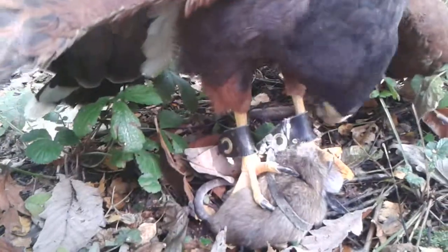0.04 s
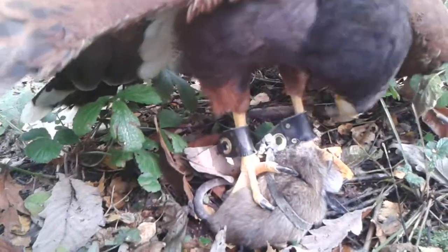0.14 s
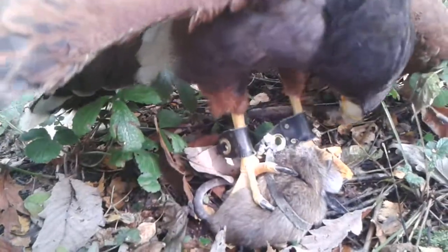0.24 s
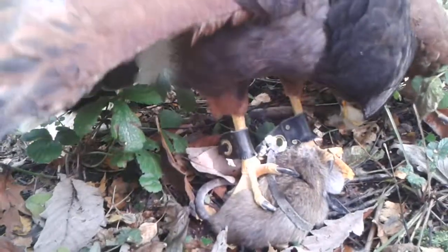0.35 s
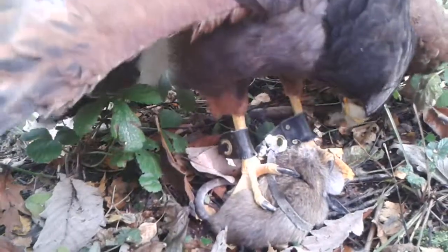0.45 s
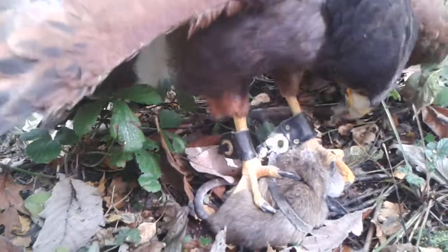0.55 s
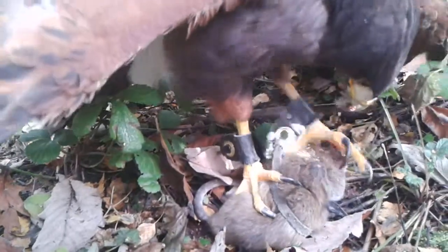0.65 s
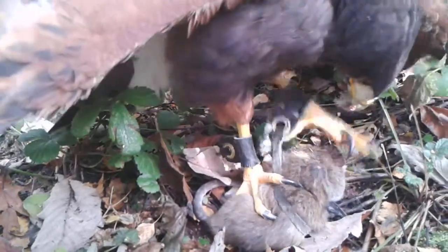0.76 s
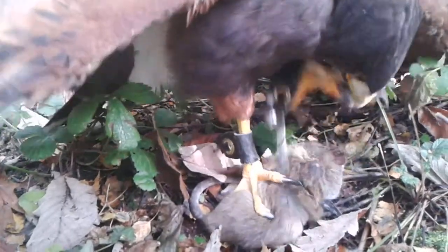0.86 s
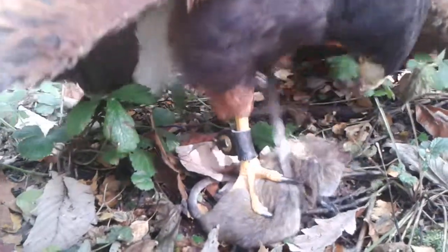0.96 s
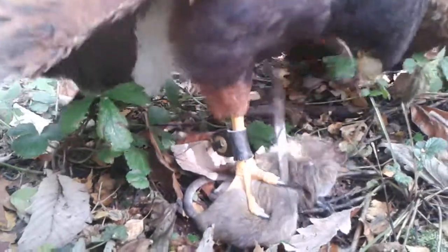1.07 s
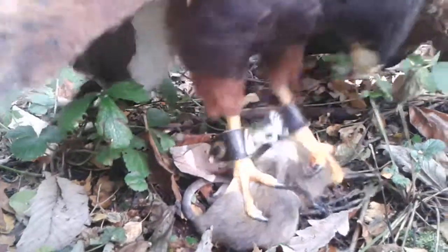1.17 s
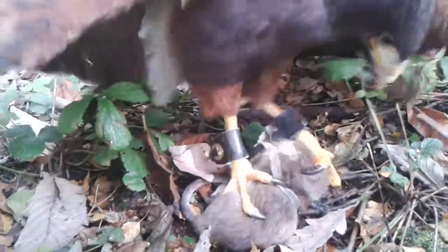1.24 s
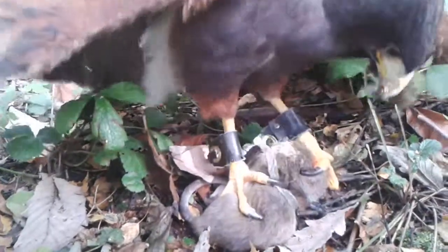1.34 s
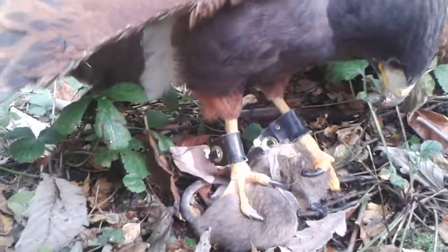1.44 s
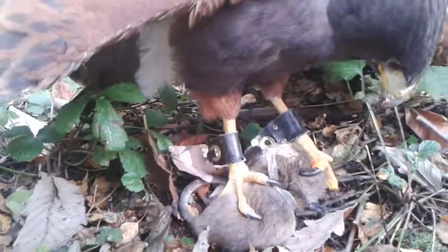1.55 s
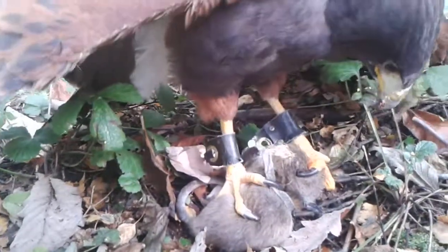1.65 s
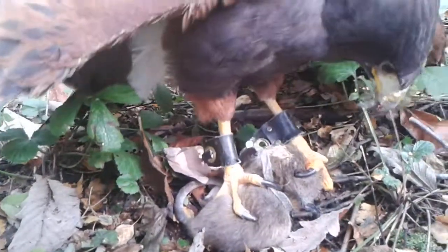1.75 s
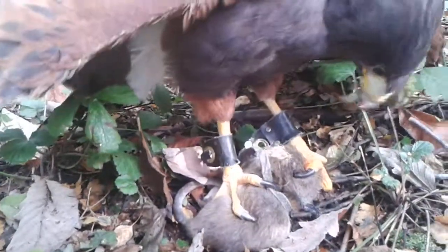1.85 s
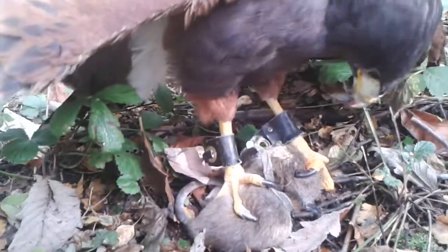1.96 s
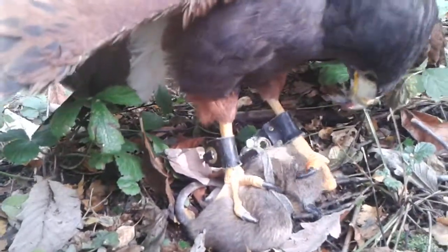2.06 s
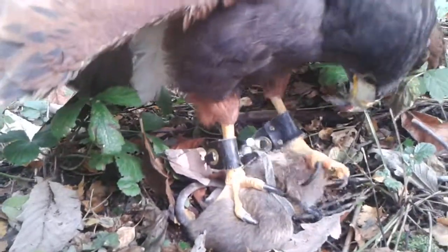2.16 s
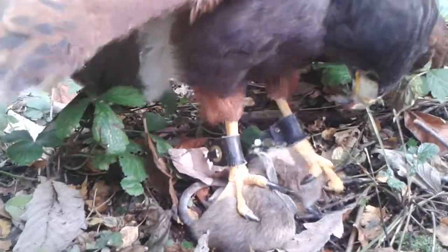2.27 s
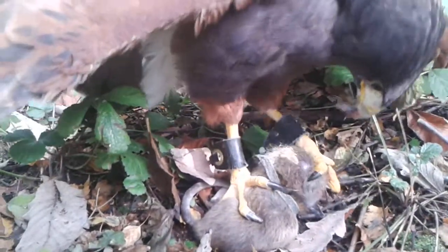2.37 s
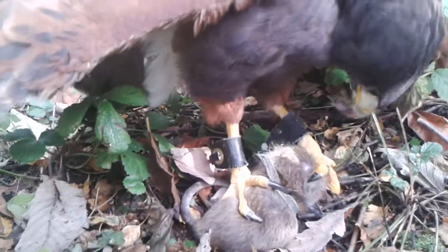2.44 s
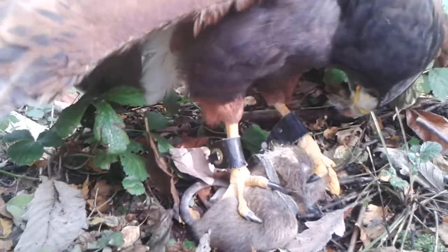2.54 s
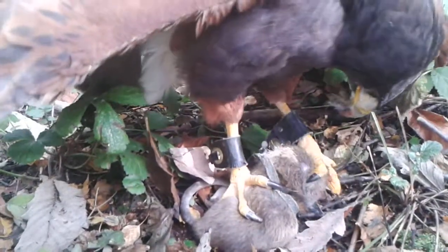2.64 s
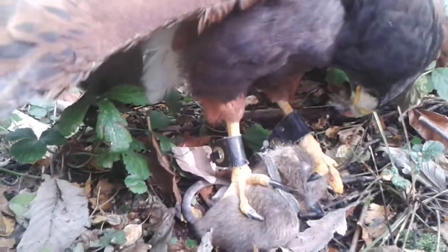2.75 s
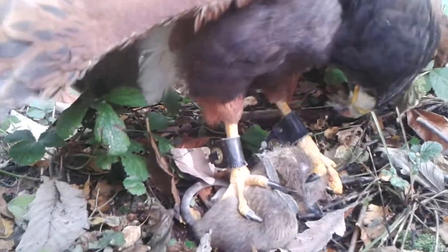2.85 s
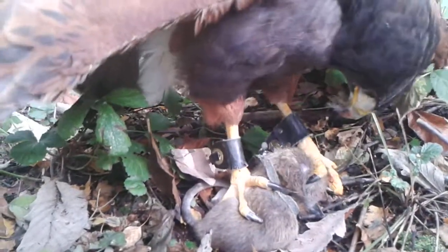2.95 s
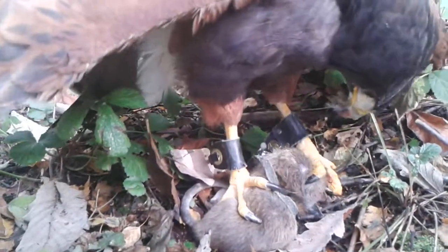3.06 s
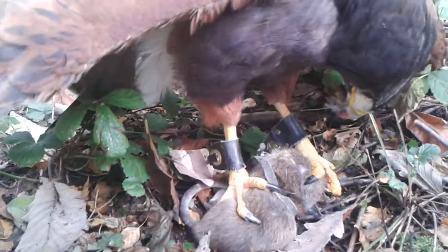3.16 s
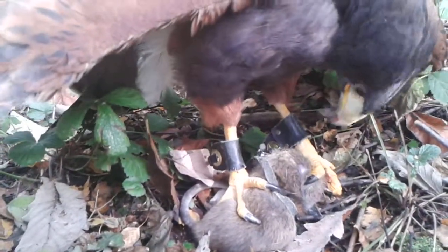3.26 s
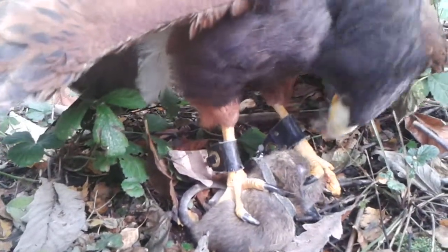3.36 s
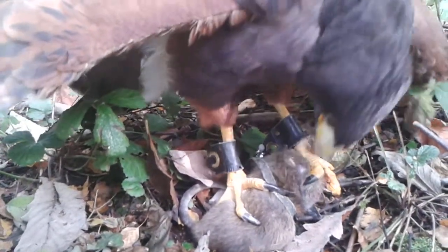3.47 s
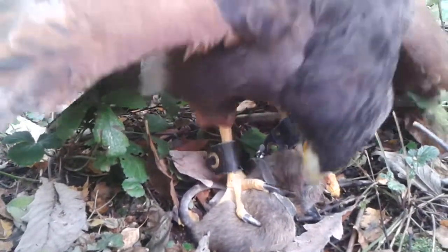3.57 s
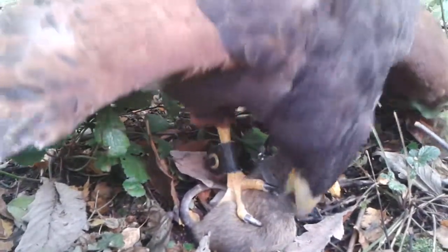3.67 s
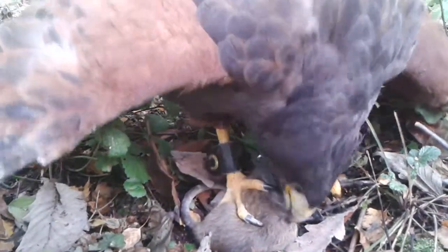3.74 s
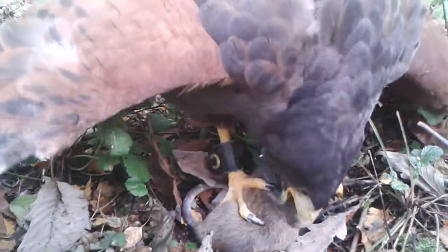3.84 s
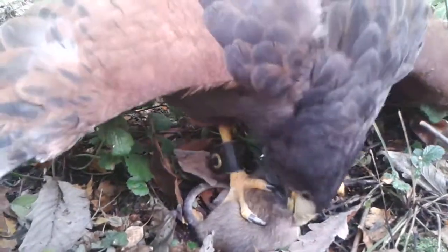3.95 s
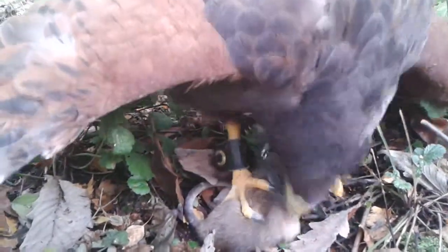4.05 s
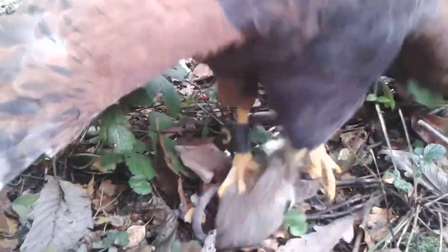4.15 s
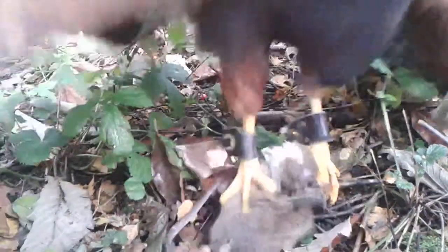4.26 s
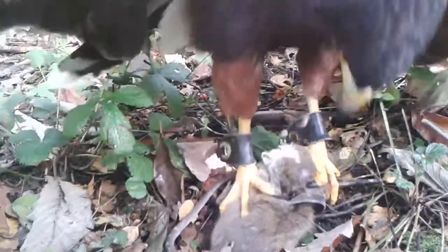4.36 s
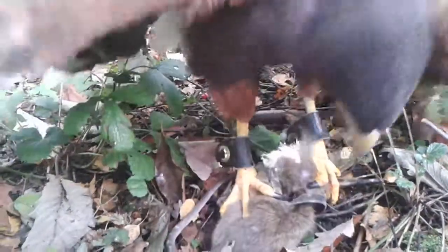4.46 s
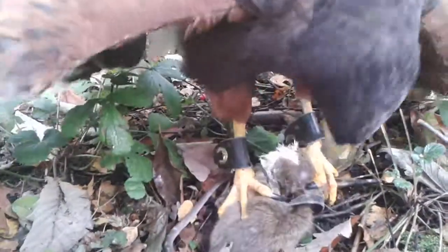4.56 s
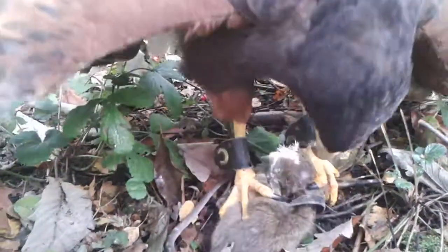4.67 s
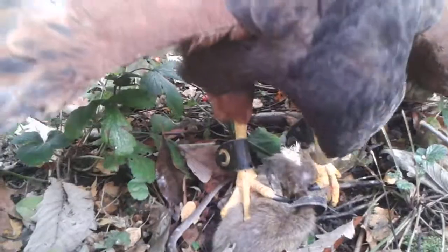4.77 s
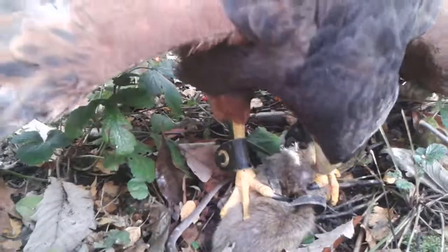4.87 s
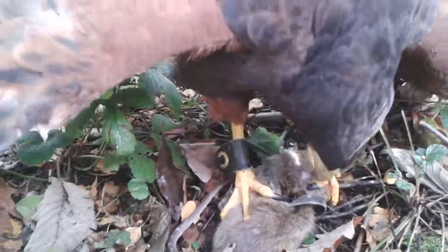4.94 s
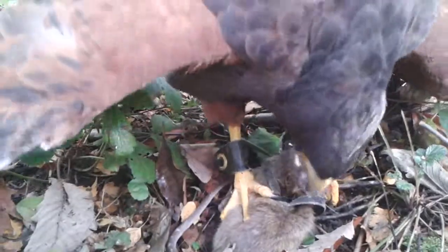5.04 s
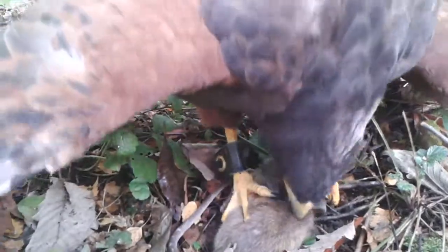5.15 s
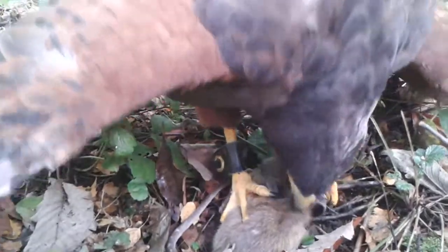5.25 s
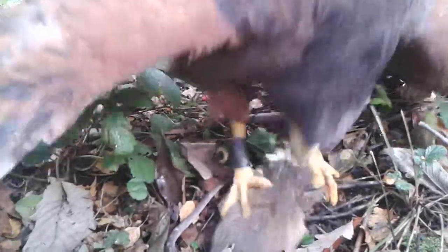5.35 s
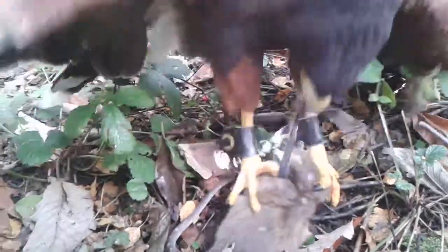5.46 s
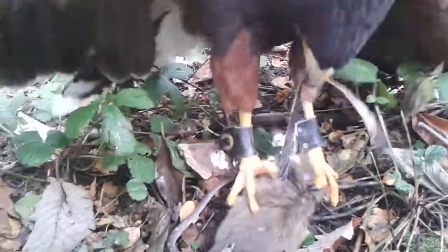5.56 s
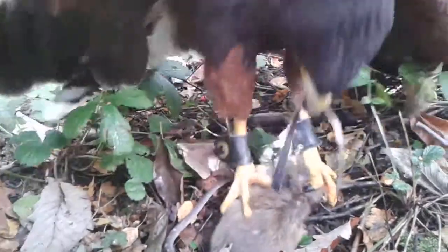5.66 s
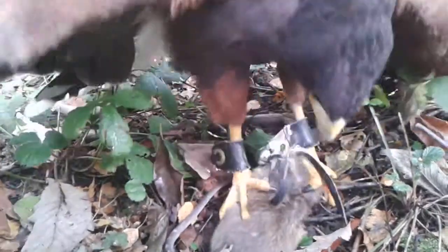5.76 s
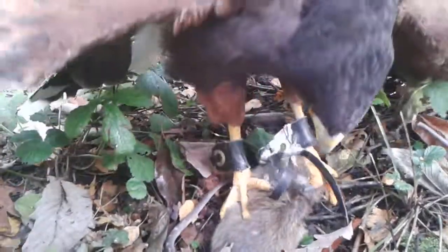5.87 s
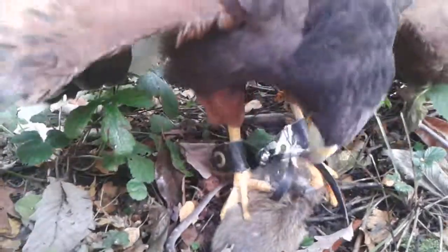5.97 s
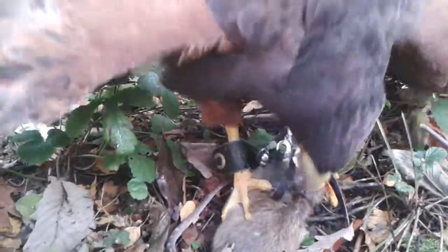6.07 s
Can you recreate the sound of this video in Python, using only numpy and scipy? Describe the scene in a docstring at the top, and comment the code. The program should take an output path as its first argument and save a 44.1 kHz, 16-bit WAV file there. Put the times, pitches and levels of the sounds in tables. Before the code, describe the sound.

Close and dry outdoors, a faint low hush of distant air and traffic, with slight hiss, lies under a hawk moving in leaf litter. Until 0.7 s there is only faint rustling. From 0.7 to 1.6 s its small slit bell jingles rapidly: bright, high, metallic pings around four kilohertz with thinner overtones, knocked and choked irregularly by the pellet, strongest near 1.25 s, with crisp leaf rustle and dull knocks. A weaker tinkle comes at 2.2 to 2.5 s. Then quiet, with tiny ticks at 3.4 to 4.0 s and a soft dull knock. At about 4.3 s a hard, sharp snap and crunchy rustle accompany a thinner jingle lasting until 4.65 s. Sparse ticks follow. From 5.45 to 5.85 s comes the loudest, densest jingling, ringing and slightly overloaded around 5.6 s, with hollow pips and rustling, then it stops abruptly into hush.

```python
"""Outdoors in leaf litter, a small round slit bell on a hawk jingles as the bird shifts its feet.
The loose pellet knocks and rubs the shell, each touch resetting and damping three split pairs of modes,
while puffs of the air inside pip under the ring. Grains of noise rustle as leaves and fur, short
resonances snap and knock, and filtered noise lays a quiet hush below. Loud moments overload the recorder."""
import sys
import numpy as np
from scipy import signal
from scipy.fft import rfft, irfft, next_fast_len
from scipy.io import wavfile

SR = 44100
rng = np.random.default_rng(int(sys.argv[2]) if len(sys.argv) > 2 else 0)


def dump_mix(stems):
    """Bounce the given channels to the path in sys.argv[1] as a 16-bit WAV at rate SR."""
    frames = np.atleast_2d(stems).T  # one column per channel
    limited = np.clip(frames, -1, 1)  # hard clip at full scale
    pcm = np.round(limited * 32767).astype(np.int16)
    wavfile.write(sys.argv[1], SR, pcm)


def volts_from_db(level):
    """Convert decibel levels to linear amplitude ratios."""
    exponent = np.asarray(level, float) / 20
    return 10 ** exponent


N = 269451

# pellet strikes, damping until the next touch; levels before the place splits each pair, damping before
# each pair takes its share: start_s, low_pair_db, high_pair_db, place_deg (around the shell), damping_db_per_s
STRIKES = [(.719, -22.5, -50, 73, 1400), (0.734, -17.5, -50, 4, 61), (.751, -22, -52.5, 177, 600),
           (.7867, -11.5, -36.5, 87, 1411), (.8205, -40, -50, 95, 3000), (0.8287, -12, -49, 4, 60),
           (0.8437, -5.5, -43, 14, 260), (0.8516, -9, -31.5, 91, 691), (0.8726, -32.5, -46, 32, 683.5),
           (0.8835, -27, -53, 73, 58), (0.8935, -9, -33.5, 21, 1640), (0.9195, -13, -31.5, 86, 2200),
           (.937, -18, -26, 5, 2300), (.9464, -23, -30, 106, 58), (0.9545, -21.5, -40, 60, 93),
           (0.9857, -9.5, -31.5, 176, 251), (1.023, -16, -39, 27, 651), (1.037, -18.5, -33.5, 26, 800),
           (1.0625, -22.5, -47, 5, 58.5), (1.0833, -32, -38, 64, 200), (1.095, -16.5, -44.5, 110, 981),
           (1.1071, -21, -49.5, 150, 60), (1.1153, -38, -42, 3, 610), (1.1237, -20.5, -43.5, 140, 300),
           (1.1334, -15, -38, 6, 134), (1.1647, -21, -39, 160, 154.5), (1.1958, -30.5, -40, 117, 400.5),
           (1.211, -33, -49, 146, 59.5), (1.2182, -18, -39, 85, 58), (1.224, -11.5, -38, 180, 60),
           (1.234, -4.5, -17, 39, 60.5), (1.2424, -7, -18, 149, 1568), (1.2499, -12.5, -21.5, 78, 144),
           (1.2556, -2, -25.5, 76, 410), (1.2666, -9, -33.5, 4, 646), (1.2775, -6.5, -31, 95, 340),
           (1.2871, -21.5, -34, 5, 300), (1.2989, -21, -27, 60, 899), (1.3241, -27, -37, 6, 60),
           (1.332, -17, -43, 4.1, 700), (1.3431, -11, -31.5, 177, 70.5), (1.356, -18.5, -28, 175, 108),
           (1.3655, -12, -32.5, 86, 211.5), (1.4325, -17, -36.5, 120, 58), (1.439, -6, -44, 81, 57.5),
           (1.448, -14.5, -30.5, 82, 554.5), (1.4575, -11, -34.5, 89, 64), (1.465, -13.5, -41, 91, 852.5),
           (1.51, -26, -50.5, 96, 397.5), (1.5509, -29, -53, 93, 946), (1.5604, -16.5, -38, 100, 1574.5),
           (1.57, -22, -44, 92, 900), (1.5912, -29.5, -40.5, 156, 1651), (2.14, -46.5, -62, 90, 400.5),
           (2.194, -18.5, -39, 174, 237), (2.207, -30, -48, 100, 210), (2.2203, -25, -43.5, 9, 285),
           (2.2395, -21.5, -46.5, 94, 1000), (2.2804, -42, -65, 2, 63), (2.2859, -27, -51, 6, 58.5),
           (2.2957, -23, -35, 1, 1010.5), (2.334, -26.5, -46.5, 176, 336), (2.378, -43.5, -57, 92, 900),
           (2.406, -42.5, -55.5, 5, 900), (2.433, -42, -54, 93, 900), (2.467, -49, -52, 66, 262),
           (2.491, -32.5, -38, 88, 1201), (2.5013, -45, -48, 72, 550), (2.5294, -36, -46, 176, 390),
           (4.206, -34.5, -70, 9, 108.5), (4.235, -24, -41.5, 97, 400), (4.288, -33, -56, 83, 57.5),
           (4.3075, -22, -48, 78, 1226), (4.3198, -20, -47, 165, 56), (4.3228, -35.5, -45.5, 300, 60),
           (4.3409, -23.5, -43, 172, 241), (4.3734, -31.5, -37, 146, 58), (4.3842, -28, -45, 55, 176),
           (4.402, -15, -22, 33, 63), (4.4182, -10.5, -23.5, 47, 393.5), (4.4314, -20.5, -24.5, 180, 343),
           (4.4457, -25.5, -38.5, 46, 143), (4.458, -34, -29.5, 140, 163), (4.4718, -20.5, -36.5, 79, 265),
           (4.4844, -29.5, -40.5, 31, 100), (4.5148, -23, -38.5, 61, 189), (4.527, -35, -33, 105, 307),
           (4.5417, -32, -41.5, 5, 628.5), (4.6084, -31, -43, 107, 809.5), (4.6305, -33.5, -44, 179, 900),
           (5.4466, -39.5, -60, 85, 63.5), (5.4699, -18, -32, 9, 174), (5.4834, -20.5, -31.5, 101, 84),
           (5.5051, -25.5, -41.5, 114, 164.5), (5.5298, -13.5, -16, 80, 57), (5.544, -8, -14.5, 125, 1240),
           (5.5545, -7.5, -24, 87, 495), (5.5595, -2.5, -27.5, 166, 58), (5.5649, -8.5, -16.5, 77, 147.5),
           (5.582, -2, -23.5, 167, 621), (5.5961, 3, -27.5, 176, 293.5), (5.6031, -12.5, -27, 110, 61.5),
           (5.623, -12, -27.5, 111, 100), (5.63, -12, -27, 112, 238), (5.6455, -20, -24, 55, 60),
           (5.6529, -9, -25.5, 130, 148), (5.6658, -5, -20, 166, 338), (5.678, -11, -31, 180, 58),
           (5.6875, -3.5, -29, 88, 216), (5.692, -4, -29, 87, 222.5), (5.706, -7, -32.5, 63, 195),
           (5.7289, -3.5, -27, 88.7, 347), (5.7526, -12.5, -25, 21.7, 370), (5.7766, -7.5, -35, 76, 310),
           (5.7954, -18.5, -27.5, 79, 300), (5.802, -17.5, -30.5, 72, 480), (5.811, -33, -36, 33, 63),
           (5.819, -22.5, -30.5, 87, 1200), (5.8333, -50, -57, 98, 196)]


def rms_one(x):
    """Scale to an rms of 1."""
    return x / np.sqrt(np.mean(x ** 2) + 1e-20)


def resonance(x, hz, width_hz):
    """A two-pole resonator: a unit click rings with height about 1."""
    radius, turn = np.exp(-np.pi * width_hz / SR), 2 * np.pi * hz / SR
    return signal.lfilter([0, np.sin(turn)], [1, -2 * radius * np.cos(turn), radius * radius], x + 1e-18)


def cut(x, hz, kind, order):
    """Butterworth low or high cut."""
    return signal.sosfilt(signal.butter(order, hz, kind, fs=SR, output="sos"), x + 1e-18)


def coloured(x, spectrum):
    """Shape the spectrum of x along (Hz, dB) points over log frequency; rms 1."""
    size = next_fast_len(N)
    hz, db = np.transpose(spectrum)
    bins_hz = np.arange(size // 2 + 1) * SR / size + 1
    gain = volts_from_db(np.interp(np.log(bins_hz), np.log(hz), db))
    return rms_one(irfft(rfft(x, size) * gain, size)[:N])


def drift(rate_hz):
    """Slow random wander of rms 1: noise through two equal low-pass poles."""
    pole = np.exp(-2 * np.pi * rate_hz / SR)
    noise = rng.standard_normal(N + SR)
    return rms_one(signal.lfilter([1], [1, -2 * pole, pole * pole], noise)[SR:])


def clicks(start_s, size):
    """Single-sample impulses of the given sizes."""
    out = np.zeros(N)
    np.add.at(out, np.round(np.asarray(start_s) * SR).astype(int), size)
    return out


def hush(level_db=-60.5, waver_db=0.4):
    """Far wind and traffic and the recorder's own hiss: coloured noise, gently wavering."""
    # colour of the hush: pitch_hz, level_db (per Hz, relative)
    hush_colour = [(18, -46), (30, -23.5), (122, -3.5), (235, -6), (291, -8.5), (340, -12.5), (593, -23.5),
                   (1210, -28.5), (4770, -17), (15200, -42), (16500, -51.5)]
    return volts_from_db(level_db + waver_db * drift(3.1)) * coloured(rng.standard_normal(N), hush_colour)


def rustle(per_s=1500, spread_db=3.5, flutter_db=2.0):
    """Dense uneven grains of dry leaf follow the feet, with a duller shuffle and a fine hiss of fur."""
    # feet working in the litter: start_s, crisp_db (before flutter), dull_db
    footwork = [(0, -61, -67.5), (.6, -59, -64), (.71, -48, -65), (.81, -52, -60.5), (.97, -44.5, -60.5),
                (1.14, -49, -63), (1.24, -41, -57), (1.41, -51, -57.5), (1.74, -58.5, -65.5),
                (1.99, -62.5, -67), (2.2, -53.5, -65.5), (2.35, -50.5, -57.5), (2.6, -60.5, -67.5),
                (3.35, -68.5, -69), (3.64, -58.5, -65.5), (4.071, -68, -71), (4.19, -41.5, -60),
                (4.28, -43.5, -59), (4.32, -36.5, -52), (4.35, -42.5, -58), (4.42, -45, -58),
                (4.63, -58.5, -64.5), (4.92, -65.5, -70.5), (5.3, -67.5, -69), (5.43, -47, -63),
                (5.49, -52, -64), (5.58, -47, -52.5), (5.63, -50.5, -63), (5.82, -49.5, -61),
                (5.96, -64, -67.5), (6.11, -64.5, -71)]
    # colours of crisp leaf, dull shuffle and fur: pitch_hz, level_db (per Hz, relative)
    leaf_colour = [(1200, -27.5), (2600, -12), (4370, 1), (7800, -19), (10000, -31)]
    shuffle_colour = [(150, -20.5), (500, -3.5), (1200, -7.5), (2500, -11.5), (4000, -29.5)]
    fur_colour = [(5000, -25.5), (8000, -1), (12000, -2), (15500, -4.5), (16500, -21)]
    s, *levels = np.transpose(footwork)
    sizes = volts_from_db(spread_db * np.minimum(rng.exponential(1, N), 5)) * rng.choice([-1, 1], N)
    grains = sizes * (rng.random(N) < per_s / SR) + 0.33 * rng.standard_normal(N)
    crisp_db, dull_db = (np.interp(np.arange(N) / SR, s, db) for db in levels)
    crisp = volts_from_db(crisp_db) * coloured(grains, leaf_colour)
    dull = volts_from_db(dull_db) * coloured(rng.standard_normal(N), shuffle_colour)
    # fur hisses faintly always, and steeply more once the crisp rustle passes a threshold
    fur_rest_db, fur_from_db, fur_slope = -76.5, -56.5, 1.6
    fur_db = fur_rest_db + fur_slope * np.maximum(crisp_db - fur_from_db, 0)
    fur = volts_from_db(fur_db) * coloured(grains, fur_colour)
    return volts_from_db(flutter_db * drift(30)) * (crisp + fur) + dull


def snaps():
    """Twigs, leaves and claws snap: a click and short splintering noise ring three bright resonances."""
    # snaps: start_s, level_db (of the click, before the resonances)
    cracks = [(1.2105, -23), (2.125, -41), (3.4256, -47), (3.6077, -51), (3.6321, -44.5), (3.7088, -44),
              (3.9779, -47), (4, -44), (4.2217, -27), (4.2941, 1), (4.7476, -50), (4.778, -49.5),
              (4.8953, -39.5), (5.214, -39.5), (5.2314, -40), (5.3742, -50), (5.8374, -31.5)]
    out, t = np.zeros(N), np.arange(600) / SR
    splinters = rng.standard_normal((len(cracks), 600))
    for (s, db), noise in zip(cracks, splinters):
        burst = 0.1 * noise * np.exp(-t / 0.0017)
        burst[0] += 1
        crack = resonance(burst, 5610, 800)
        crack = crack + 0.99 * resonance(burst, 4700, 900)
        crack = crack + 0.3 * resonance(burst, 11000, 2000)
        i = round(s * SR) + 30   # the crack comes a moment after first contact
        out[i:i + 600] += volts_from_db(db) * cut(crack, 2500, "high", order=2)
    return out


def knocks():
    """Foot and beak knock dully: each click rings its body for a few cycles, with the bass cut away."""
    # knocks: start_s, level_db (before the cuts), pitch_hz (of the body)
    blows = [(1.2265, -26.5, 447), (1.2365, -23.5, 250.8), (1.2365, -26.5, 950), (1.9655, -37.5, 202),
             (3.8235, -38, 1080), (3.9765, -31, 877), (4.2945, -21, 362), (4.2945, -15, 1603),
             (4.2946, -19.5, 818)]
    out = np.zeros(N)
    for s, db, hz in blows:
        body = resonance(clicks([s], volts_from_db(db)), hz, 0.16 * hz + 150)
        out += cut(body, 0.3 * hz, "high", order=2)
    return cut(out, 3800, "low", order=2)


def puffs(strike_puff_db=-22, scatter_db=3.5, bounce_s=0.014, bounces_per_s=120.0):
    """Pellet blows push the air inside the shell: short hollow pips, then random skittering bounces."""
    # hard slaps of the pellet across the slit: start_s, level_db (before the air's resonances)
    slaps = [(0.7188, -40), (0.829, -26), (.835, -30), (0.8723, -28), (.9198, -23), (0.9372, -23.5),
             (0.9465, -20.5), (0.955, -30), (.9849, -27), (1.0845, -30), (1.0953, -24.5), (1.1043, -29),
             (1.1134, -30), (1.1219, -30), (1.2181, -27), (1.2444, -21), (1.2573, -19.5), (1.278, -23),
             (1.338, -29.5), (1.3482, -27.5), (1.3566, -28), (1.3658, -26.5), (1.438, -23.5), (1.447, -25),
             (1.458, -28.5), (2.1941, -25), (2.2067, -43), (2.2218, -38), (2.2391, -37), (2.2877, -39),
             (2.294, -38), (2.4671, -37.5), (4.515, -41), (4.525, -44), (5.5068, -40), (5.5306, -25.5),
             (5.5444, -21), (5.5556, -17), (5.5655, -13), (5.596, -11.5), (5.602, -15.5), (5.624, -29.5),
             (5.631, -33), (5.646, -35), (5.667, -22), (5.6774, -31), (5.6872, -25.5), (5.692, -27),
             (5.7, -36), (5.7056, -31), (5.729, -29), (5.7523, -29.5), (5.7766, -27.5)]
    # air inside the slit shell and the slap on its lips: pitch_hz, width_hz, level_db
    air = [(3214, 220, 2.5), (3450, 250, -1), (4700, 2100, -6.5)]
    s, db = np.transpose(slaps)
    struck_s, struck_db = np.transpose(STRIKES)[:2]
    # every strike also puffs a little, some way under its low pair
    faint_db = struck_db + strike_puff_db + scatter_db * rng.standard_normal(len(struck_s))
    push = clicks(s, volts_from_db(db)) - clicks(struck_s, volts_from_db(faint_db))
    fading = signal.lfilter([1], [1, -np.exp(-1 / (bounce_s * SR))], abs(push))
    bounces = rng.standard_normal(N) * (rng.random(N) < bounces_per_s / SR)
    push = push + volts_from_db(-18.0) * fading * bounces
    pips = sum(volts_from_db(air_db) * resonance(push, hz, width) for hz, width, air_db in air)
    return cut(pips, 3150, "high", order=10)


def contacts():
    """Pellet strikes and rests in time order: start, dB of the three pairs, place, damping."""
    # the pellet settles against the shell and chokes the ring: start_s
    rest_times = [0.7984, .8355, 0.8616, 0.9045, 1.318, 1.479, 1.5374, 1.6086, 2.3576, 2.392, 2.418, 2.447,
                  2.5417, 4.2264, 4.27, 4.5625, 4.665, 5.864]
    # level of the middle pair against its neighbours' shares, gliding between points: time_s, level_db
    middle_carry = [(.72, -13), (.79, -5), (.84, -11.5), (.93, -7), (.96, -16), (1.0, -9.5), (1.2, -13),
                    (1.3, -12), (1.35, -15), (1.45, -13.5), (1.6, -17), (2.2, -16.5), (2.3, -14),
                    (2.45, -7.5), (2.53, -18), (4.24, -13), (4.31, -9), (4.35, -15.5), (4.48, -15),
                    (4.53, -7.5), (4.63, -8.5), (5.47, -14), (5.545, -18), (5.556, -5.5), (5.57, -18),
                    (5.596, -1), (5.63, -1.5), (5.67, -16.5), (5.7, -8.5), (5.82, -15.5)]
    s, low_db, high_db, place, damping = np.transpose(STRIKES)
    # the middle pair lies between its neighbours, taking a share of each one's dB
    middle_db = 0.35 * low_db + 0.61 * high_db + np.interp(s, *np.transpose(middle_carry))
    middle_db = middle_db + 1.5 * rng.standard_normal(len(s))
    strikes = np.c_[s, low_db, middle_db, high_db, place, damping]
    rests = [(when, -85, -85, -85, 70, 900) for when in rest_times]
    rows = np.vstack([strikes, rests])
    return rows[np.argsort(rows[:, 0])].T


def bell(contact_s=(.0003, .0002, .00015), stiffen_hz=0.011, wobble_hz=6.0, smother_db_s=(5000, 3000, 2000)):
    """Each touch leaves every mode at a new height; the place of the touch splits a pair's energy."""
    # split mode pairs: lower_hz, upper_hz, waves (around the shell), turn_deg (of the pattern),
    # damping_share (factor)
    mode_pairs = [(4052, 4275, 2, 2.5, 1.25), (8783, 9165, 3, 111.5, 1.01), (14240, 14700, 4, 38, 0.78)]
    # short rings of the stiff shell at each touch: pitch_hz, width_hz, level_db
    shell_ticks = [(5157, 1900, 0), (7350, 540, -13), (9700, 700, -9), (12470, 300, -8), (15200, 1100, -13)]
    s, *pair_db, place, damping = contacts()
    t = np.arange(N) / SR
    last = np.maximum(np.searchsorted(s, t, side="right") - 1, 0)   # index of the latest touch
    since = np.where(t < s[0], 9, t - s[last])   # 9 s of decay keeps the bell silent before the first touch
    gaps_s = np.diff(s, append=s[-1])
    luck = rng.standard_normal((len(s), 14))
    ring, jumps = np.zeros(N), np.zeros((3, len(s)))
    for k, (low_hz, high_hz, waves, turn, share) in enumerate(mode_pairs):
        angle = np.radians(waves * place + turn)
        soften = np.exp(-1 / (contact_s[k] * SR))
        for j, (hz, part) in enumerate([(low_hz, np.cos(angle)), (high_hz, np.sin(angle))]):
            height = volts_from_db(pair_db[k]) * (abs(part) + 0.034)
            left_over = height * volts_from_db(-share * damping * gaps_s)
            before = np.r_[0, left_over[:-1]]
            # a big change of height also throws the phase
            change = abs(height - before) / (height + before)
            phase = np.cumsum(2.0 * luck[:, 2 * k + j] * change)
            jumps[k] += np.maximum(height - before, 0.44 * (before - height))
            # a pellet coming to rest smothers what still rings within some milliseconds
            resting = np.where(pair_db[k] < -70, before, 0)
            size = height[last] * volts_from_db(-share * damping[last] * since)
            size = size + resting[last] * volts_from_db(-smother_db_s[k] * since)
            # a damping pellet stiffens the shell a little (Hz per dB/s)
            detune = stiffen_hz * np.minimum(damping, 2500)
            # each touch detunes every mode at random, by about wobble_hz at the lowest
            # and in proportion above
            detune = detune + wobble_hz * hz / mode_pairs[0][0] * luck[:, 6 + 2 * k + j]
            carrier = 2 * np.pi * np.cumsum(hz + detune[last]) / SR
            # a strike that outweighs what still rings starts the mode afresh, in step with its twin
            fresh = np.maximum.accumulate(np.where(height > 2 * before, np.arange(len(s)), 0))
            phase = phase - (phase + carrier[(s * SR).astype(int)])[fresh]
            held_phase = np.where(resting > 0, np.r_[0, phase[:-1]], phase)   # a rest keeps the old phase
            swing = size * np.exp(1j * held_phase)[last]
            # the contact time rounds off every jump
            swing = signal.lfilter([(1 - soften) ** 2], [1, -2 * soften, soften ** 2], swing)
            ring += np.imag(swing * np.exp(1j * carrier))
    # the sharper the touch, the more the stiff shell ticks
    uneven = volts_from_db(3 * luck[:, 12]) * np.sign(luck[:, 13])
    sharp = clicks(s, (0.057 * jumps[0] + jumps[1] + 0.36 * jumps[2]) * uneven)
    shell = np.zeros(N)
    for k, (hz, width, db) in enumerate(shell_ticks):
        shell += volts_from_db(db) * resonance(sharp, hz, width) * (-1) ** k   # alternating polarity
    return cut(ring, 2600, "high", order=2) + cut(shell, 3100, "high", order=4)


def scene():
    """The hush, the litter and the bell, summed to one channel."""
    return (hush() + rustle() + snaps() + knocks() + puffs() + bell())[None]


def roll_off(x):
    """The treble ends steeply here."""
    return signal.sosfilt(signal.butter(12, 16650, fs=SR, output="sos"), x)


def record(dry):
    """A small microphone trims the top, then peaks hit a hard ceiling."""
    top_hz, ceiling = 15630, 0.69   # ceiling as a share of full scale
    mic = cut(dry, top_hz, "low", order=12)
    mix = np.clip(mic, -ceiling, ceiling)
    return roll_off(mix)


dry = scene()
out = record(dry)
dump_mix(out)
```